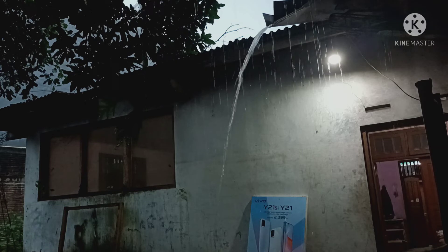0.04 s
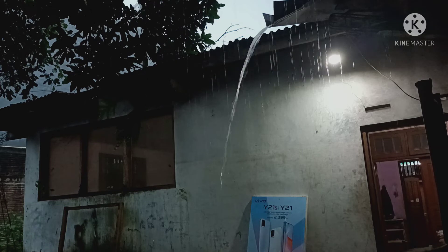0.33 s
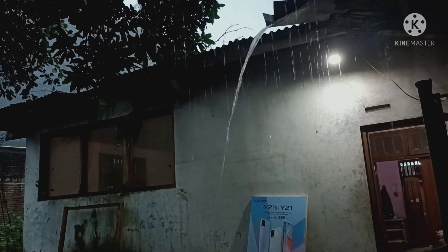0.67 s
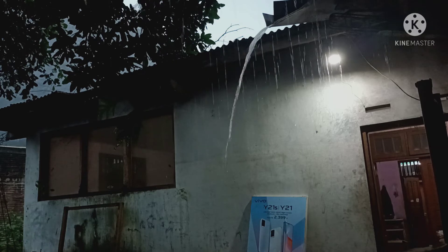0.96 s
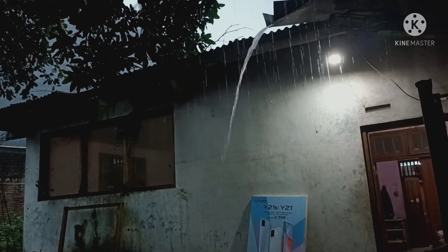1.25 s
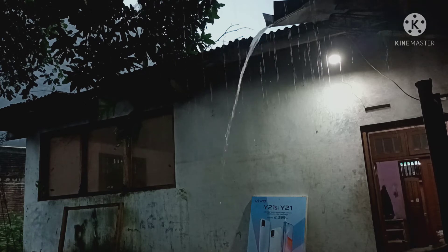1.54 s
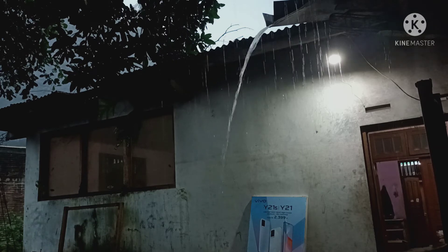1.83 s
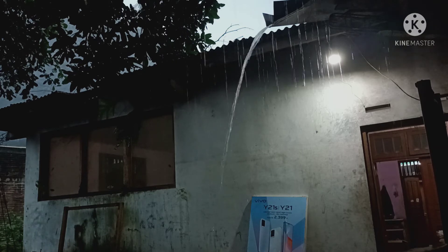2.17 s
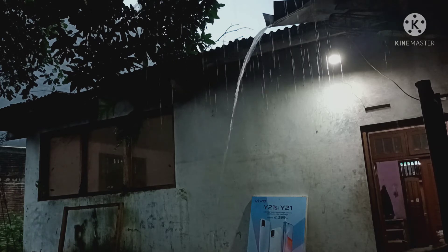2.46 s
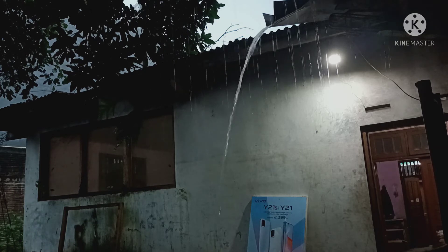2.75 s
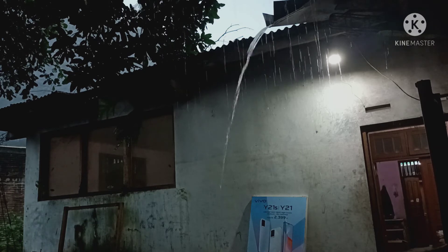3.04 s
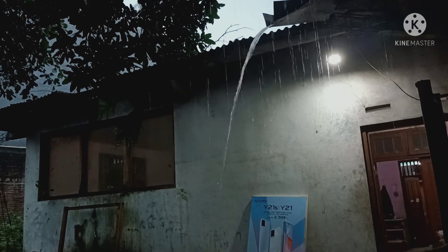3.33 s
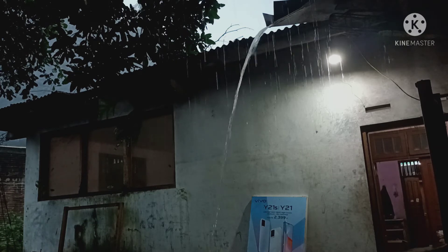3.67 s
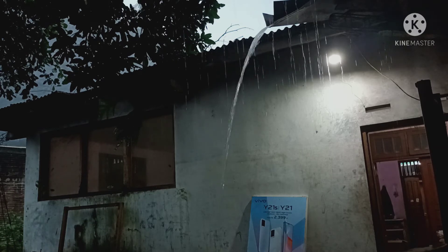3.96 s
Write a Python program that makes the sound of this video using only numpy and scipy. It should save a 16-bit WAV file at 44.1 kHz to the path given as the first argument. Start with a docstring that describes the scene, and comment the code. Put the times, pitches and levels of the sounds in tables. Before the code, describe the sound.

Rain patters steadily outside a house, plinking in puddles as water slops off the roof. Occasional heavy drops land nearby and faint birds whistle, then trill, over a low rumble of air on the microphone.

```python
"""Steady rain on a house roof and garden, heard from the yard. From the start: a wash of far drops, near
patter, bubbles plinking in puddles, air rumbling on the microphone, run-off slopping on the ground.
Fat drops then smack close by and small birds whistle, both echoed by the house wall. Soft splashes on
wet ground join at 0.4 s, large bubbles at 0.6 s, bird trills at 2 s. The hardest drop lands at 2.7 s."""
import sys
import numpy as np
from scipy import signal
from scipy.fft import rfft, irfft
from scipy.io import wavfile
from scipy.ndimage import uniform_filter1d

SR = 44100
rng = np.random.default_rng(int(sys.argv[2]) if len(sys.argv) > 2 else 0)


def transcribe(u):
    """Save the signal u as a 16-bit wav file named by the first command-line argument.

    u: samples, shape (n,) or (channels, n), limited to [-1, 1]; the rate is SR.
    q: integer samples, one column per channel.
    """
    v = np.clip(np.atleast_2d(u).T, -1, 1)
    q = np.round(v * 32767).astype(np.int16)
    wavfile.write(sys.argv[1], SR, q)


N = 176400

# sound field width: freq_hz, side_minus_mid_db
FIELD_WIDTH = [(30, -9.5), (70, -5), (140, -8), (280, -6), (550, 3.5), (1000, -0.6), (2000, 0.1),
               (12000, 0)]
# sound field lean: freq_hz, left_minus_right_db
FIELD_LEAN = [(30, -4), (70, 4.5), (140, -0.6), (1000, -0.1), (2500, -0.3), (5000, -0.9), (8000, -2),
              (13000, -3.5)]
# far rain: freq_hz, density_db
WASH_SPECTRUM = [(60, -24), (120, 0.5), (170, -.5), (295, -0.5), (365, -6.5), (460, -0.5), (570, -9),
                 (720, -2), (1050, -1.5), (1400, -1.5), (2000, -7), (3000, -10.5), (4800, -13.5),
                 (6000, -19), (9000, -23), (13000, -23.5), (15500, -32)]
# small near drops: freq_hz, density_db
PATTER_SPECTRUM = [(300, -40), (1000, 8.5), (2500, -12.5), (6000, -3.5), (10000, -5.5), (15000, -17)]
# moving air: freq_hz, density_db
RUMBLE_SPECTRUM = [(15, -31), (26, -10), (38, -1.5), (50, 2), (75, -4), (95, -6.5), (118, -18),
                   (180, -42.5)]
# rumble swells: peak_s, rise_db
AIR_GUSTS = [(.22, 4), (.69, 9), (1.37, 6), (1.5, 7.5), (2.31, 8.5), (2.76, 3), (2.96, 7), (3.16, 7.5),
             (3.25, 5.5), (3.44, 4.5), (3.56, 7)]
# run-off spray: freq_hz, density_db
RUNOFF_SPECTRUM = [(400, -15), (1000, 5), (2200, -1), (4500, 2), (6500, -6), (9000, -9.5), (15000, -17)]
# run-off slops: start_s, gain_db, hold_s
RUNOFF_SLOPS = [(0, -0.5, 0.12), (0.298, -6, 0.037), (0.642, 0.5, 0.052), (1.102, 0.5, 0.042),
                (1.423, -0.5, 0.059), (1.642, -1, .02), (1.788, -1, 0.058), (1.871, -3, 0.19),
                (2.157, 1, 0.054), (2.287, 0, 0.032), (2.665, 3.5, 0.16), (3.406, 0.5, 0.022),
                (3.538, -2.5, 0.033), (3.795, -7, 0.066)]
# close drops: start_s, smack_gain_db, ring_hz, ring_gain_db, left_minus_right_db
FAT_DROPS = [(0.0445, -18, 5900, -20.5, -1), (.137, -25, 4500, -34, -6), (.871, -25, 10100, -33, -1),
             (1.201, -23, 5460, -28.5, -3), (1.7806, -30, 2530, -24, 0), (1.8, -25, 11900, -23, -6),
             (2.17, -32, 4760, -29, 4), (2.2874, -22, 5230, -21.5, -1), (2.6837, -14.5, 4420, -12, -2),
             (2.6846, -29, 5850, -16, -6), (3.4488, -25, 1100, -28.5, 6), (3.7992, -28, 3300, -29, -10)]
# smack of a close drop: freq_hz, density_db
SMACK_SPECTRUM = [(200, -0.5), (900, 3), (2500, -6), (6000, -1.5), (10000, -8), (15000, -17)]
# bird whistles: start_s, length_s, start_hz, end_hz, gain_db, waver_ratio
BIRD_WHISTLES = [(.085, 0.042, 4720, 4340, -49, .008), (0.203, 0.14, 4980, 4700, -51.5, 0),
                 (0.466, 0.042, 5080, 4420, -43, .005), (0.627, 0.12, 4960, 4734, -44, 0.01),
                 (0.707, 0.089, 3860, 3950, -49, 0.01), (.86, 0.087, 3930, 3750, -46, 0.05),
                 (.895, 0.057, 4720, 4330, -48, .02), (0.929, 0.05, 3600, 3500, -48, 0.04),
                 (1.026, 0.16, 5090, 4760, -48.5, .009), (1.081, 0.2, 3300, 3400, -47.5, 0.06),
                 (1.28, 0.06, 5050, 4170, -44.5, .016), (1.294, 0.096, 3220, 3490, -49.5, 0),
                 (1.3, 0.082, 7900, 7960, -55, 0.03), (1.439, 0.12, 4960, 4660, -46, 0),
                 (1.487, 0.14, 5300, 4760, -47.5, 0.03), (1.498, 0.065, 3340, 3310, -48.5, .025),
                 (1.53, 0.07, 7850, 8030, -50.5, .009), (1.704, 0.052, 5020, 4200, -42.5, .018),
                 (1.858, 0.11, 4940, 4700, -41.5, .004), (1.936, 0.066, 5180, 4840, -45, .005),
                 (2.398, 0.066, 5250, 4780, -45.5, .01), (2.438, 0.042, 4000, 4660, -42.5, 0),
                 (2.455, 0.071, 4180, 4090, -46, .006), (2.575, 0.032, 4380, 4930, -44, 0.04),
                 (3.151, 0.05, 3750, 4610, -46, .012), (3.286, 0.048, 3900, 4530, -46, 0.07)]
# splashes on wet ground: start_s, centre_hz, level_db, left_minus_right_db
SOFT_SPLASHES = [(0.42, 12500, -38, -8), (.585, 8000, -38, 1), (1.472, 12100, -45, -1),
                 (1.651, 6400, -43, 0), (2.031, 7800, -40, -1), (2.9, 7700, -41, -1),
                 (3.187, 6740, -33.5, -1), (3.324, 7600, -38, -4), (3.665, 8500, -40, -5),
                 (3.857, 7000, -35, -4)]
# large bubbles: start_s, pitch_hz, level_db
LARGE_BUBBLES = [(0.576, 1126, -30), (.683, 2540, -33), (2.287, 2240, -27.5), (2.678, 985, -30),
                 (3.449, 1035, -43), (3.858, 2740, -33)]
# bird trills: start_s, length_s, pitch_hz, warbles_per_s, gain_db, rise_db
BIRD_TRILLS = [(2.04, .28, 3860, 31.5, -43.5, 7), (2.16, .17, 4550, 36, -46, 2),
               (2.713, 0.345, 3740, 30.5, -40.5, 3.5), (3.515, 0.18, 3850, 35, -43.5, -1)]

BIN_HZ = np.arange(N // 2 + 1) * SR / N
BIRD_ATTACK_S, BIRD_RELEASE_S = 0.0048, 0.017


def undb(db):
    """Decibels to gain."""
    return 10 ** (np.asarray(db) / 20)


def level(x, rms_db):
    """Set the rms level."""
    return x * undb(rms_db) / np.sqrt(np.mean(x ** 2))


def per_bin(table):
    """Interpolate a table over log frequency."""
    hz, db = np.array(table, float).T
    return np.interp(np.log(BIN_HZ + 1e-3), np.log(hz), db)


def colour(x, spectrum):
    """Filter by a spectrum, keeping the power of white noise."""
    gain = undb(per_bin(spectrum))
    return irfft(rfft(x) * gain / np.sqrt(np.mean(gain ** 2)), N)


def walk(rate_hz):
    """Random steps, smoothed twice; spread near 1."""
    hold = int(SR / rate_hz)
    steps = np.repeat(rng.standard_normal(N // hold + 1), hold)
    return 1.3 * uniform_filter1d(uniform_filter1d(steps, hold), hold)[:N]


def surround(pair):
    """Two unrelated signals as mid and side, out as left and right."""
    mid, side = rfft(pair)
    width, lean = undb(per_bin(FIELD_WIDTH)), undb(per_bin(FIELD_LEAN) / 2)
    left, right = (mid + width * side) * lean, (mid - width * side) / lean
    return irfft(np.array([left, right]) / np.sqrt(1 + width ** 2), N)


def pan(left_minus_right_db):
    """Left and right gains."""
    return undb([[left_minus_right_db / 2], [-left_minus_right_db / 2]])


def spatter(rate_per_s, spread_db, decay_s):
    """Random impacts of uneven strength, each a tiny noise burst."""
    hits = rng.random((2, N)) < rate_per_s / SR
    strength = undb(spread_db * np.minimum(rng.exponential(size=(2, N)), 5))
    power = signal.lfilter([1], [1, -np.exp(-2 / (decay_s * SR))], (hits * strength) ** 2 + 1e-12)
    return np.sqrt(power) * rng.standard_normal((2, N))


def wash(swell_db=0.1, flicker_db=0.98):
    """Countless far drops merge into noise whose octaves flicker."""
    noise, swell = rfft(rng.standard_normal((2, N))), swell_db * walk(1.1)
    octave = np.log2(np.maximum(BIN_HZ, 125) / 125).astype(int)
    bands = (irfft(noise * (octave == k), N) * undb(swell + flicker_db * walk(18)) for k in range(8))
    return surround(level(colour(sum(bands), WASH_SPECTRUM), rms_db=-36))


def patter():
    """Small near drops land as separate ticks."""
    ticks = spatter(rate_per_s=760, spread_db=1, decay_s=0.0024)
    return surround(level(colour(ticks, PATTER_SPECTRUM), rms_db=-46.5))


def bubble(age_s, hz, decay_cycles, glide_ratio=0.064):
    """A trapped bubble rings down, rising slightly in pitch."""
    life = age_s * hz / decay_cycles
    return np.exp(-life) * np.sin(2 * np.pi * hz * age_s * (1 + glide_ratio * np.tanh(life / 2)))


def plinks(rate_per_s=300, low_hz=795.6, high_hz=7080, tilt_db_per_oct=0.5, range_db=12):
    """Drops in puddles trap small bubbles that ring briefly."""
    age_s = np.arange(SR // 20) / SR
    out = np.zeros((2, N + len(age_s)))
    for when, height, strength, place in rng.random((int(rate_per_s * N / SR), 4)):
        hz = low_hz * (high_hz / low_hz) ** height
        gain_db = tilt_db_per_oct * np.log2(hz / low_hz) + range_db * strength
        ring = undb(gain_db) * bubble(age_s, hz, decay_cycles=9.2)
        start, angle = int(when * N), 2 * np.pi * place
        out[:, start:start + len(ring)] += np.outer([np.cos(angle), np.sin(angle)], ring)
    return surround(level(out[:, :N], rms_db=-45.5))


def air(t, gust_sigma_s=0.017):
    """Moving air rumbles on the microphone, swelling in brief gusts."""
    gust_db = sum(db * np.exp(-((t - peak_s) / gust_sigma_s) ** 2 / 2) for peak_s, db in AIR_GUSTS)
    rumble = colour(rng.standard_normal((2, N)), RUMBLE_SPECTRUM)
    return surround(level(rumble * undb(gust_db), rms_db=-35))


def runoff(t, rise_s=0.0044, fall_s=0.076):
    """The stream off the roof lands in uneven slops, each a cloud of droplets."""
    flow = np.zeros(N)
    for start_s, gain_db, hold_s in RUNOFF_SLOPS:
        rise = np.clip((t - start_s) / rise_s, 0, 1)
        fall = np.exp(-np.maximum(t - start_s - hold_s, 0) / fall_s)
        flow += undb(gain_db) * rise * fall
    spray = colour(spatter(rate_per_s=4000, spread_db=-4, decay_s=0.00047), RUNOFF_SPECTRUM)
    return surround(level(spray, rms_db=-41.5) * flow)


def echoes(x, gain_db, t60_s=0.54, gap_s=0.006):
    """Scattered reflections from wall, eaves and trees."""
    t = np.arange(SR // 2) / SR
    tail = rng.standard_normal((2, len(t))) * undb(-60 * t / t60_s) * (t > gap_s)
    tail /= np.sqrt(np.sum(tail ** 2, axis=1, keepdims=True))
    return undb(gain_db) * signal.fftconvolve(x[None], tail, axes=1)[:, :N]


def fat_drops(t, smack_s=0.00051, splash_s=0.0064, splash_db=-9, ring_peak_cycles=0.95, trim_db=1):
    """A fat drop smacks, rings for a few cycles and throws a short splash."""
    envelope, ring = np.zeros((2, N)), np.zeros((2, N))
    lag_s = np.array([[0.00003], [0]])  # left lags
    for start_s, smack_db, hz, ring_db, pan_db in FAT_DROPS:
        span = slice(int(start_s * SR), int(start_s * SR) + SR // 10)
        age_s = np.maximum(t[span] - start_s - lag_s, 0)
        gain = undb(trim_db) * pan(pan_db) * (age_s > 0)
        burst = np.exp(-age_s / smack_s) + undb(splash_db) * np.exp(-age_s / splash_s)
        envelope[:, span] += gain * undb(smack_db) * burst / 2
        life = age_s * hz / ring_peak_cycles
        ring[:, span] += gain * undb(ring_db) * np.sin(2 * np.pi * hz * age_s) * life * np.exp(1 - life)
    direct = colour(envelope * rng.standard_normal((2, N)), SMACK_SPECTRUM) + ring
    return direct + echoes(direct[1], gain_db=-14.5)


def bird_note(age_s, length_s, hz, gain_db, near_db=-29.5, loss_db_per_db=0.59):
    """A near-pure note as (direct, echo send); fainter birds are farther, so more echo."""
    attack = np.clip(age_s / BIRD_ATTACK_S, 0, 1)
    release = np.clip((length_s - age_s) / BIRD_RELEASE_S + 0.5, 0, 1)
    tone = np.sqrt(2) * undb(gain_db) * attack * release * np.sin(2 * np.pi * np.cumsum(hz) / SR)
    far_db = loss_db_per_db * np.maximum(near_db - gain_db, 0)
    return np.array([tone * undb(-far_db / 2), tone * undb(far_db / 2)])


def whistles(t, waver, glide_s=0.05, trim_db=4):
    """A bird's whistle slides and settles on a pitch."""
    song = np.zeros((2, N))
    for start_s, length_s, start_hz, end_hz, gain_db, waver_ratio in BIRD_WHISTLES:
        span = slice(int(start_s * SR), int((start_s + length_s + BIRD_RELEASE_S) * SR))
        age_s = t[span] - start_s
        slide = np.expm1(-age_s / glide_s) / np.expm1(-length_s / glide_s)
        hz = (start_hz + (end_hz - start_hz) * slide) * (1 + waver_ratio * waver[span])
        song[:, span] += bird_note(age_s, length_s, hz, gain_db + trim_db)
    return song


def birds(t, quaver_db=1.2):
    """Whistles and trills quaver in level; eaves and yard smear both."""
    waver = walk(300)
    direct, send = (whistles(t, waver) + trills(t, waver)) * undb(quaver_db * walk(200))
    eaves = echoes(direct, gain_db=-7.5, t60_s=0.08)
    yard = echoes(send, gain_db=-11.5)
    return direct * undb(-2) + eaves + yard


def splashes(t, rise_s=0.0015, sigma_oct=0.19):
    """A drop on wet ground bursts into a brief, soft, narrow-band hiss."""
    out = np.zeros((2, N))
    for start_s, centre_hz, level_db, pan_db in SOFT_SPLASHES:
        band = np.exp(-(np.log2((BIN_HZ + 1) / centre_hz) / sigma_oct) ** 2 / 2)
        hiss = level(irfft(rfft(rng.standard_normal((2, N))) * band, N), level_db)
        life = np.maximum(t - start_s, 0) / rise_s
        out += hiss * life * np.exp(1 - life) * pan(pan_db)
    return out


def plops(t):
    """Now and then a large bubble rings in a puddle."""
    return sum(undb(level_db) * bubble(np.clip(t - start_s, 0, 0.1), hz, decay_cycles=11.6)
               for start_s, hz, level_db in LARGE_BUBBLES)


def trills(t, waver, warble_hz=285, hurry_ratio=0.58, waver_ratio=0.01, send_db=-5):
    """A bird's trill warbles around one pitch and speeds up at the end."""
    song = np.zeros((2, N))
    for start_s, length_s, pitch_hz, warbles_per_s, gain_db, rise_db in BIRD_TRILLS:
        span = slice(int(start_s * SR), int((start_s + length_s + BIRD_RELEASE_S) * SR))
        age_s = t[span] - start_s
        progress = age_s / length_s
        phase = 2 * np.pi * np.cumsum(warbles_per_s * (1 + hurry_ratio * progress ** 4)) / SR
        warble = np.cos(phase) + 0.18 * np.cos(2 * phase)
        hz = (pitch_hz + warble_hz * warble) * (1 + waver_ratio * waver[span])
        note = bird_note(age_s, length_s, hz, gain_db + rise_db * (progress - 0.5))
        song[:, span] += undb([[0], [send_db]]) * note
    return song


def scene():
    """Steady rain bed plus single events, in stereo."""
    t = np.arange(N) / SR
    bed = wash() + patter() + plinks() + air(t) + runoff(t)
    return bed + fat_drops(t) + birds(t) + splashes(t) + plops(t)


def record(dry, cutoff_hz=15600):
    """Steep low-pass."""
    return signal.sosfilt(signal.ellip(10, 0.2, 80, cutoff_hz, fs=SR, output="sos"), dry)


dry = scene()
out = record(dry)
transcribe(out)
```